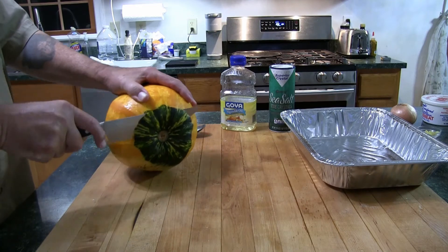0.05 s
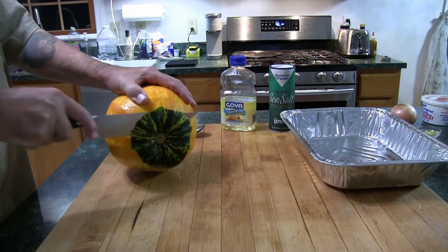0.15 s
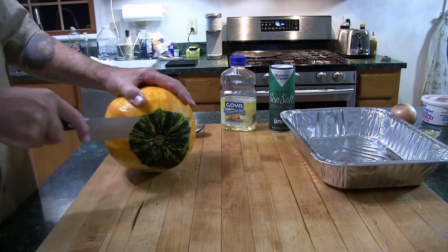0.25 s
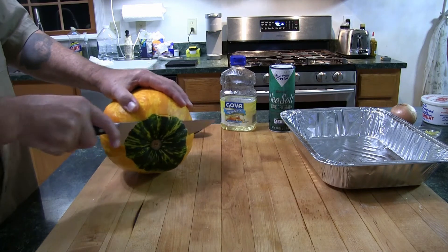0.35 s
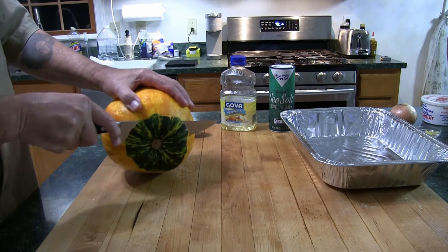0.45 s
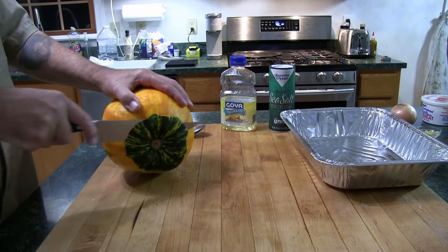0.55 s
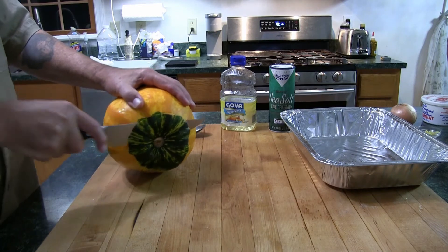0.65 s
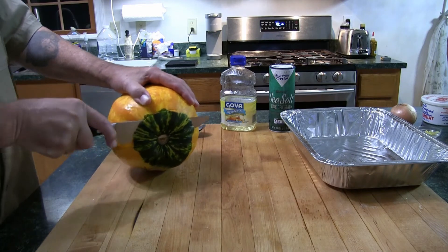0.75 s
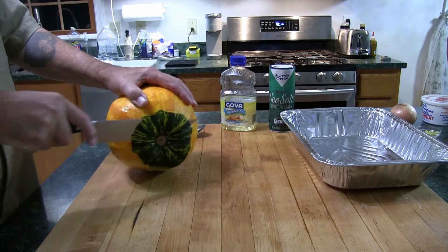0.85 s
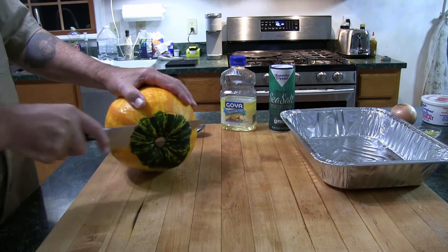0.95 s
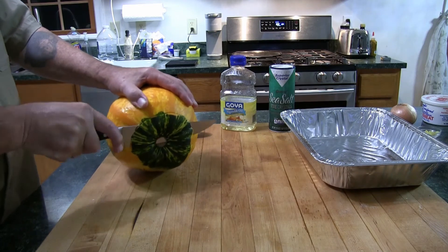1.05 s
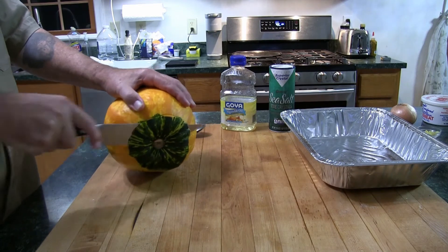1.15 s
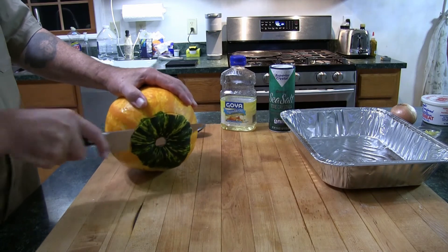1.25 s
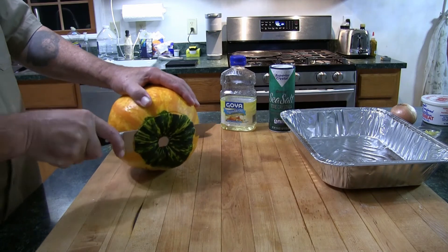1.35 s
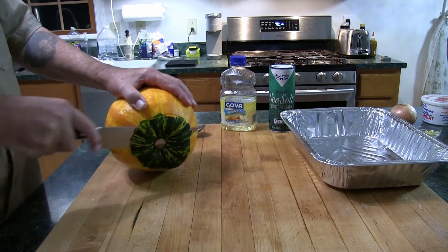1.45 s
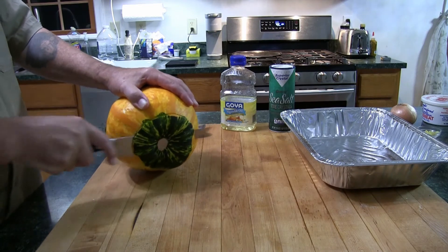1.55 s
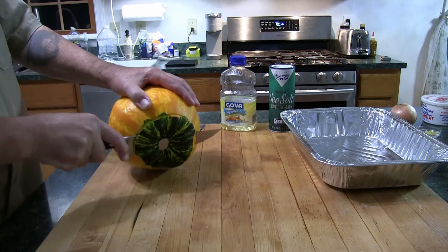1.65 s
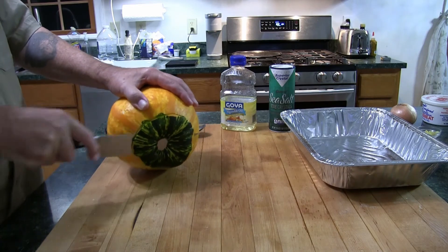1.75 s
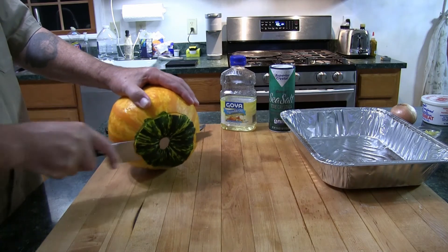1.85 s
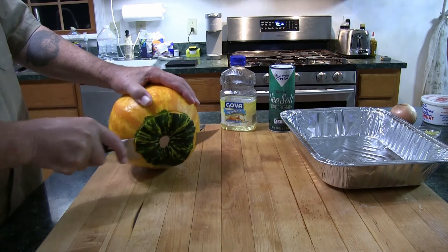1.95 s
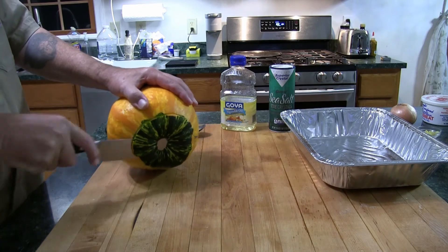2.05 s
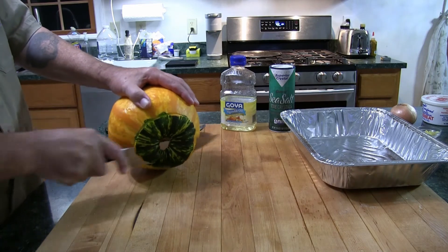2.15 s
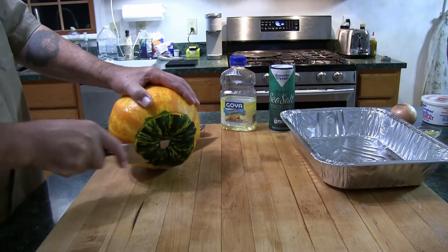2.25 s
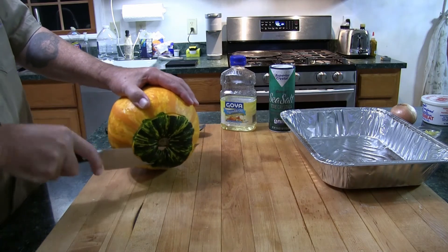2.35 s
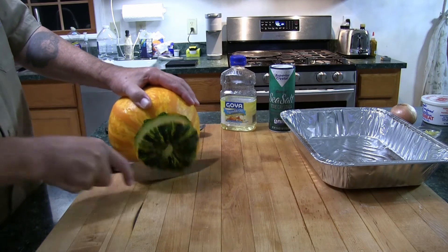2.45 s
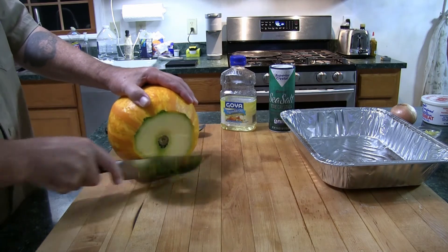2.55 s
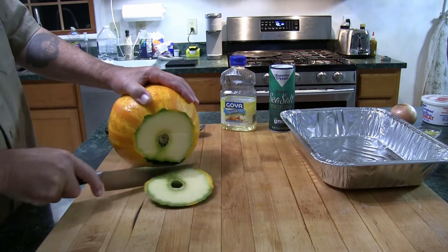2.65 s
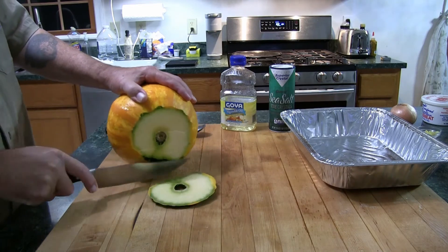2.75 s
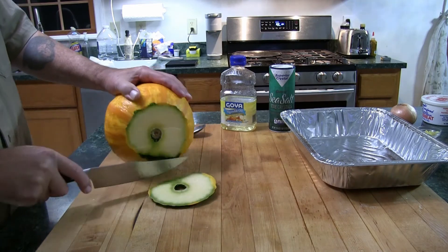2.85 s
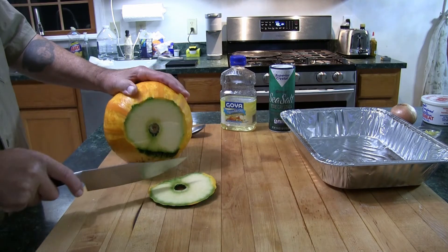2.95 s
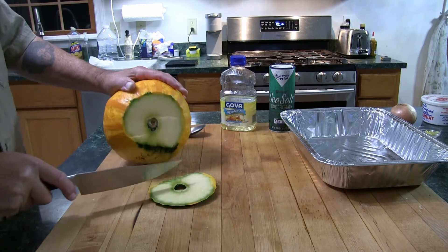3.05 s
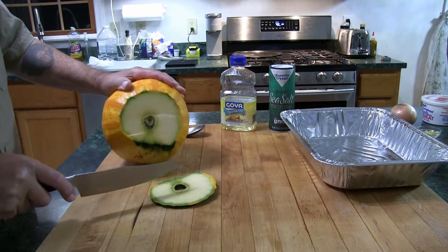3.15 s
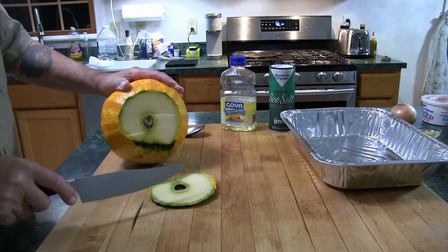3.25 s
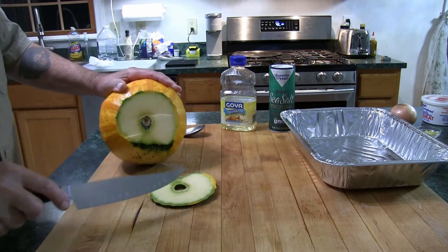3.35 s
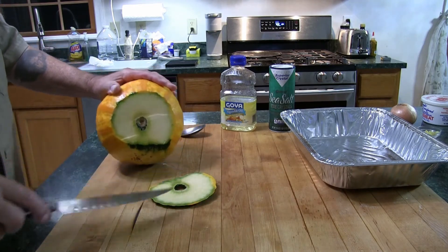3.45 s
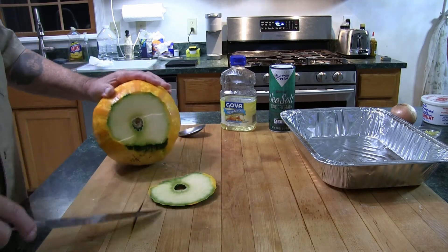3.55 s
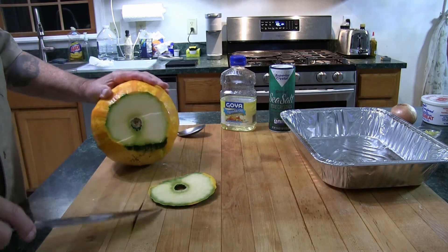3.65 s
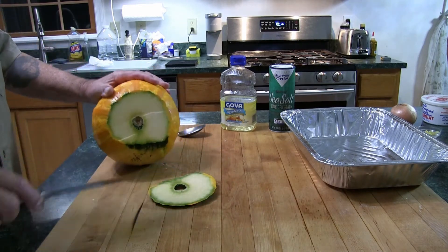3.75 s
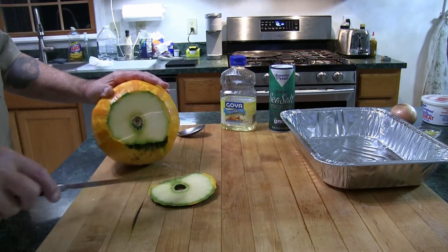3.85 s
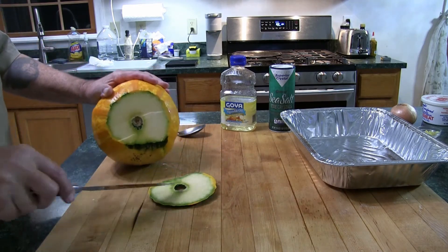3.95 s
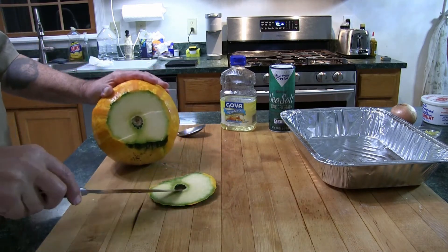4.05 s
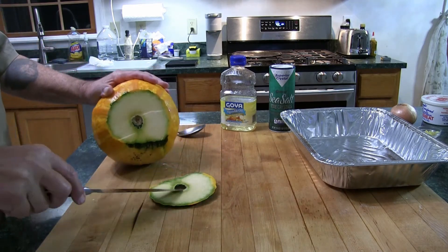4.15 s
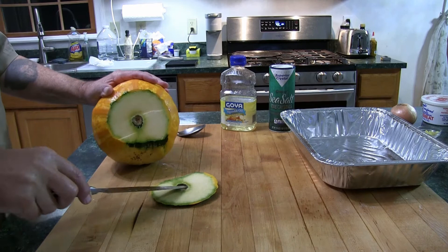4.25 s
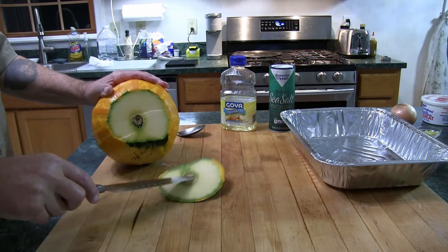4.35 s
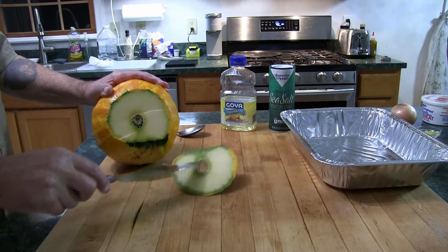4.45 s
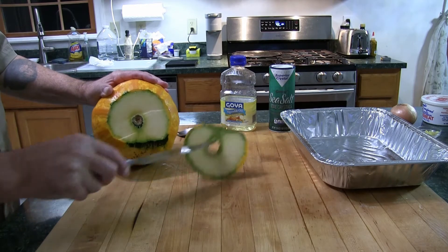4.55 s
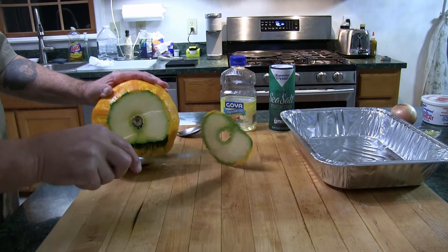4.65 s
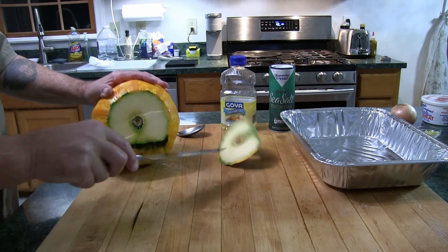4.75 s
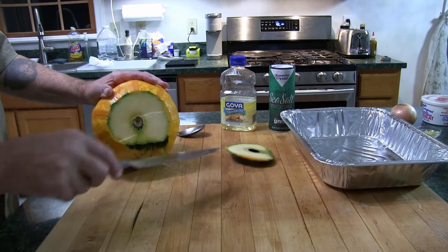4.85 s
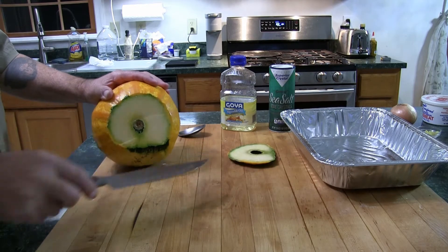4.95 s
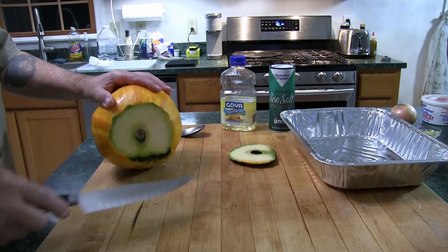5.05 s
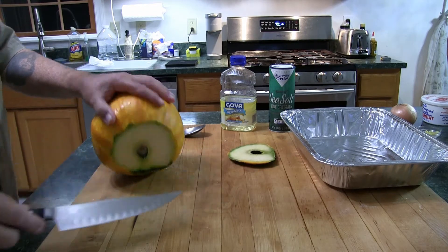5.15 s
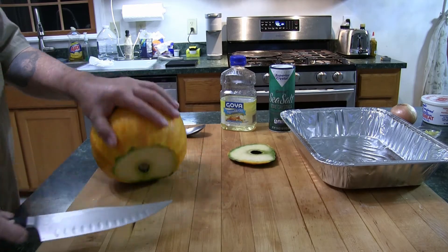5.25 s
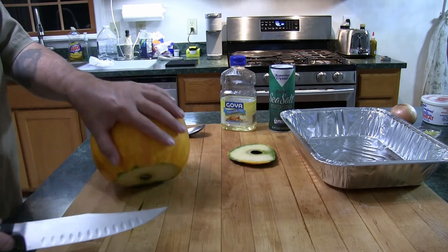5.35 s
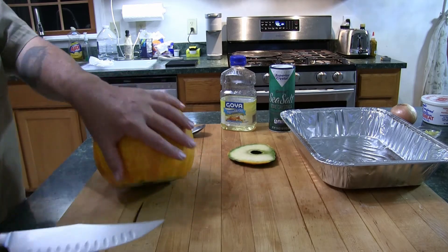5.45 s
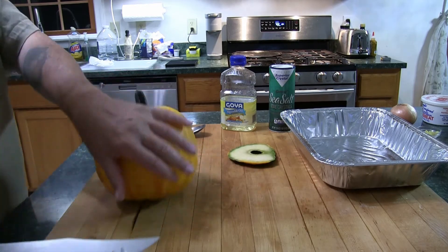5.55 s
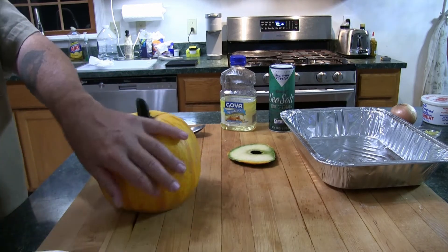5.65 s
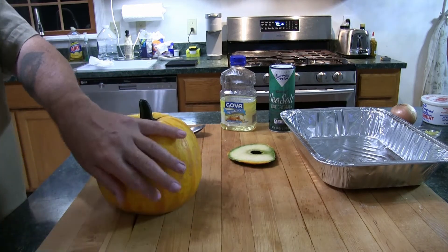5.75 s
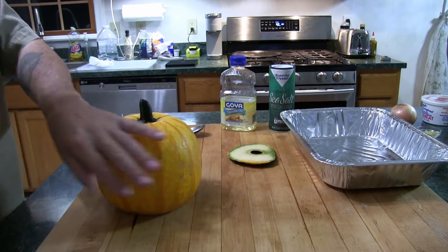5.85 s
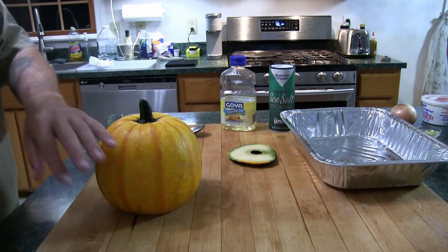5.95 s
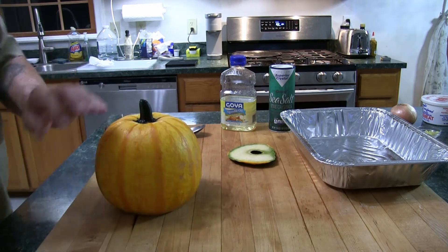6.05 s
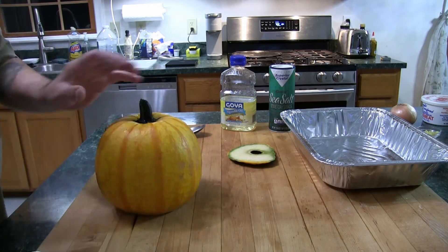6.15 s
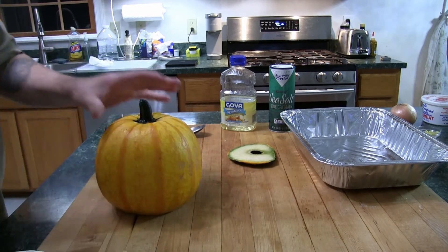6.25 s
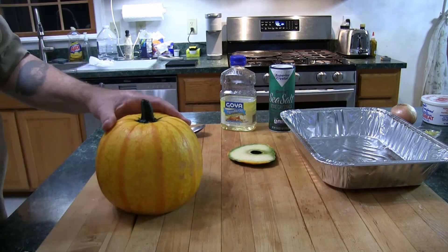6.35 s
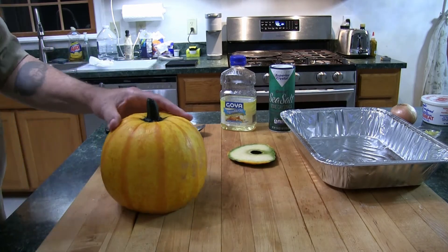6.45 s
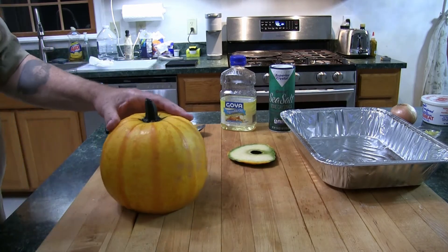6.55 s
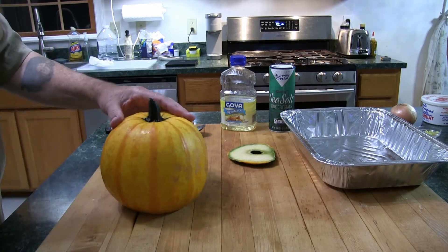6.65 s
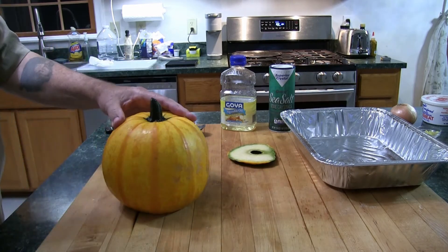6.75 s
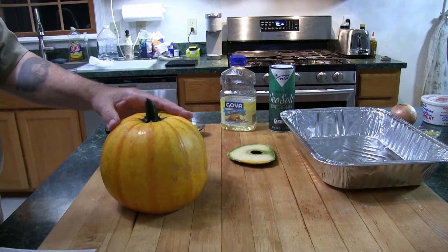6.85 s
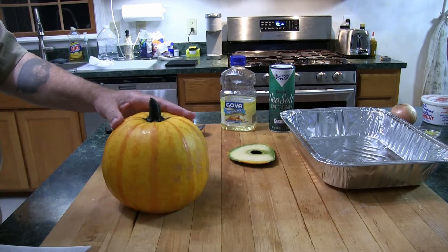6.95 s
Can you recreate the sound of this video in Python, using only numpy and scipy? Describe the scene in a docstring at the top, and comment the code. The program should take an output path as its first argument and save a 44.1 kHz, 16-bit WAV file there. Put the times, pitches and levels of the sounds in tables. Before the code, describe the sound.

A knife cracks and crunches through a pumpkin, knocks on a wooden board, and the pumpkin thumps down in a humming kitchen.

```python
"""A chef's knife is rocked through a pumpkin in a hard-walled kitchen: the rind fractures in cracks and
bursting cells crunch. At 2.5 s the blade strikes the wooden board, exciting its modes, and the slice
drops. The blade tip taps twice; near 4.9 s the slice is flipped away. At 5.7 s the pumpkin is set down
with a thump that rattles loose things and rings glassware, and then it rocks faintly. A ringing wash
lingers after each loud knock. Throughout, surfaces reflect, the room reverberates and a fridge hums."""
import sys
import numpy as np
from scipy import signal
from scipy.fft import rfft, irfft, next_fast_len
from scipy.io import wavfile
from scipy.ndimage import uniform_filter1d, map_coordinates

SR = 44100
rng = np.random.default_rng(int(sys.argv[2]) if len(sys.argv) > 2 else 0)


def waveform_to_disk(signal):
    """Save audio, clipped to [-1, 1], as 16-bit WAV at the path in sys.argv[1]."""
    frames = np.transpose(np.atleast_2d(signal))
    scaled = np.clip(frames, -1, 1) * 32767
    samples = np.round(scaled).astype(np.int16)
    wavfile.write(sys.argv[1], SR, samples)


N = 308700

# rind cracks and small ticks: t/s, level/dB, f/Hz, quality factor Q, relative level of upper mode/dB
RIND_CRACKS = [(.3296, -2.5, 4800, 5.5, -7), (0.3342, 1.5, 4970, 2.5, -18), (.3771, -20, 4200, 4, -6),
               (.3822, 2, 5230, 4, -0.5), (0.6727, -13.5, 5000, 3, -2), (0.7023, -3, 3500, 2.5, 4.5),
               (0.7135, -4, 3120, 5.3, -9.5), (0.7367, -9.5, 6070, 8, 2), (1.0022, -25, 3400, 4, -8),
               (1.0214, -12.5, 3770, 4, -7.5), (1.0305, -17, 3840, 4, -8), (1.0428, -24, 3800, 4, -10),
               (1.1765, -28, 3200, 2.7, -3), (1.299, -15.5, 3070, 7, -14), (1.3178, -12, 3270, 3.3, -22),
               (1.3204, -6.5, 3250, 3, -14), (1.33, -11, 3400, 5, -12), (1.3504, -16.5, 3350, 5, -19),
               (1.469, -29, 3500, 3.5, 0), (1.5811, -17.5, 3010, 12, -22), (1.585, -19.5, 3330, 7, -13),
               (1.7057, 3.5, 2440, 4.2, -9.5), (1.7062, -6, 6600, 5, -6), (1.8887, -15, 3470, 6, -27),
               (1.8927, -13, 2940, 4, -14), (2.161, -30, 4200, 2.4, -9), (2.1832, -24, 3100, 4.5, -17),
               (2.4737, -15, 6370, 3.3, -7), (2.4854, -5, 3300, 3, 2), (2.4883, 0.5, 3240, 17, -25),
               (2.4912, 2.5, 3230, 8.6, -24), (2.93, -29, 7000, 2, -13), (4.301, -28.5, 2850, 4.7, -20),
               (4.371, -38, 1500, 3, -8), (4.8657, -17.5, 2940, 8, -13), (4.8769, -17.5, 5500, 2, 6.5),
               (4.9615, -24, 3500, 3, -9), (5.546, -31.5, 3980, 2, -15), (5.6734, -15.5, 3500, 3, -4),
               (6.834, -35.5, 2100, 8.5, -16)]
UPPER_RATIO, UPPER_Q = 1.65, 3  # upper mode of a crack: frequency ratio to the lower, quality factor
CAVITY = (571, 45)  # resonance of the hollow pumpkin: f/Hz, bandwidth/Hz
# pushes of the blade through flesh: peak t/s, swell/s, fade/s, crunch level/dB, wet hiss level/dB
BLADE_PUSHES = [(.335, 0.016, 0.078, -32, -36), (.385, 0.023, 0.13, -38, -36),
                (0.679, 0.017, 0.043, -37, -53), (.725, 0.034, 0.073, -32.5, -34),
                (1.04, 0.089, 0.045, -40.5, -36), (1.324, 0.054, 0.072, -38.5, -31.5),
                (1.59, 0.022, 0.14, -39, -39.5), (1.719, 0.024, 0.29, -40, -36.5),
                (1.895, .02, 0.059, -43, -38.5), (2.19, 0.063, 0.12, -43, -42.5),
                (2.493, 0.017, .022, -23, -19)]
SWELL_DB, JUICE_FADE = 22, 0.73  # level change over a swell or fade; hiss fade time over crunch fade time
# noise spectra: f/Hz, level/dB
CRUNCH_SPECTRUM = [(300, -46), (700, -3.5), (1500, -7.5), (2300, -2), (3100, -2), (3800, 0), (5000, -9.5),
                   (8000, -13.5), (12000, -11.5), (16000, -43)]
JUICE_SPECTRUM = [(2500, -41), (5000, 10), (9000, 4.5), (14000, -4), (17000, 0)]
RUB_SPECTRUM = [(400, -14), (800, -4.5), (1450, -3.5), (1900, -4.5), (3000, -27), (9000, -37)]
RATTLE_SPECTRUM = [(1200, -28), (2200, 2), (4000, -5.5), (7000, -13.5), (12000, -24.5), (16000, -40)]
AIR_SPECTRUM = [(15, -56), (30, -52), (50, -20), (75, -24), (105, -10.5), (150, -12), (285, -7.5),
                (520, -9.5), (720, -14.5), (830, -18), (1500, -19.5), (3000, -22), (6000, -26.5),
                (16000, -62)]
HISS_SPECTRUM = [(1500, -25), (4000, -8.5), (8000, 3), (12000, -3), (15000, -6.5), (16500, -23)]
# impacts on the board: t/s, level/dB, low-pass corner f/Hz
KNIFE_IMPACTS = [(2.251, -43, 500), (2.5155, -2.5, 3600), (2.523, -14, 2500), (2.594, -12.5, 3180),
                 (2.624, -11.5, 3200), (2.679, -9, 2600), (5.718, -20, 3000)]
SLICE_IMPACTS = [(2.679, -14.5, 2420), (2.731, -18, 3000), (4.864, -14.5, 3000), (4.872, -12, 1600),
                 (4.959, -21, 1770)]
PUMPKIN_IMPACTS = [(5.673, -1, 1200), (5.68, -12.5, 990), (5.7, -12.5, 970), (5.718, -18, 2000),
                   (5.777, -20.5, 900)]
ROCKING_IMPACTS = [(6.391, -42.5, 900), (6.41, -49, 600), (6.735, -56, 400), (6.8, -52.5, 400),
                   (6.965, -49, 400)]
# contacts: high-pass corner f/Hz, decay constant/s, level/dB into cavity, wet face, flat blade, counter
KNIFE_CONTACT = (520, 0.02, 12.5, 0, -1, -18.5)
SLICE_CONTACT = (247, .007, 3.5, -2, -13, -4.5)
PUMPKIN_CONTACT = (109, .003, 2.5, -7.5, -22, -1)
ROCKING_CONTACT = (30, .012, -3, -12, -22, 15.5)
# resonances: f/Hz, bandwidth/Hz, level/dB
BOARD_MODES = [(153, 9.6, 4.5), (178, 17, 3), (257, 53, -0.5), (325, 25, 2.5), (436, 66, -1.5),
               (527.3, 18.4, 7), (603, 63, -1.5), (802, 36, 5.5), (1038, 100, -12), (1418, 81, 5.5),
               (1648, 120, -10)]
WET_FACE_MODES = [(1360, 250, 8)]
FLAT_BLADE_MODES = [(2310, 190, 3), (2820, 135, 13)]  # blade lying on wood
COUNTER_MODES = [(76, 9, 7), (119, 12, 4), (150, 14, 2), (185, 16, 0), (235, 30, 0)]  # heavy top under the board
WASH_RESONANCES = [(580, 40, 0), (1030, 120, -8), (1370, 70, -7), (1700, 60, -10), (2280, 60, -9),
                   (2430, 50, -9), (2800, 80, -11)]
FRIDGE_DRONES = [(182.6, 5.9, -7.5), (276, 14, 0), (356, 5.9, 0), (743, 30, -11.5), (1078, 37, -13),
                 (1500, 48, -15.5), (5440, 40, -26.5), (7460, 20, -22)]
# freely ringing modes: f/Hz, level/dB, T60/s
STEEL_MODES = [(1755, 1, .14), (2050, -6, .06), (3300, -6, .06), (3975, -2, .1), (4900, -1, .05),
               (5480, -2, .12), (6365, -3, .08), (9100, -8, .06), (11000, -11, .05)]
GLASS_MODES = [(3090, 0.5, .18), (4500, -9, .2), (5523, -8, .35)]
# touches of the blade tip, and glass jolted by the thump: t/s, level/dB
TIP_TAPS = [(3.634, -46), (3.66, -50)]
GLASS_CLINKS = [(5.727, -28.5), (5.79, -45), (5.905, -52), (5.95, -48)]
# strokes of noise: peak t/s, swell/s, fade/s, level/dB
WASH_STROKES = [(2.61, 0.089, 0.49, -23), (4.9, .04, .5, -54), (5.8, .1, .5, -48)]  # wash that lingers after each loud knock
RUB_STROKES = [(3.1, .2, 0.67, -50.5), (4.45, .15, 0.89, -58.5), (4.9, 0.12, 0.24, -50),
               (5.45, .3, .6, -54.5), (5.95, .2, .6, -50.5), (6.3, .15, 0.37, -57.5)]  # soft scraping and rubbing
RATTLE_STROKES = [(4.87, .005, 0.11, -41), (5.695, 0.034, 0.23, -34.5)]  # loose things shaken by a landing
REFLECTIONS = [(.0055, -9, -9), (.0097, -14, -13), (.0157, -14, -15), (.021, -20, -20)]  # near surfaces: delay/s, left level/dB, right level/dB
REVERBERATION = [(60, 0.47, 8.5), (250, 0.55, 6), (700, 0.77, 4), (1500, 0.81, 4), (2360, 0.97, 3),
                 (3500, 0.81, -2), (6000, 0.75, -0.5), (9800, 0.47, 5.5), (15400, 0.41, 7)]  # tail of the room: f/Hz, T60/s, level/dB
# likeness of left and right: f/Hz, coherence
ROOM_COHERENCE = [(60, 1), (250, 0.99), (700, 0.72), (2000, 0.52), (8000, 0.43), (15000, .3)]
AIR_COHERENCE = [(60, 0.65), (180, 0.96), (550, 0.66), (1650, 0.49), (4970, 0.52), (15000, 0.54)]
BACKGROUND_LEVELS = [(0, -38, -49), (.31, -40.5, -54), (.37, -49, -59), (1, -47.5, -58.5),
                     (1.6, -47, -52.5), (2, -49.5, -61.5), (2.6, -47.5, -57), (3.1, -49.5, -65),
                     (4.1, -48.5, -62), (4.6, -46.5, -61), (5.6, -44, -59.5), (5.9, -46, -62),
                     (7, -47, -61)]  # t/s, level of air and hum/dB, level of treble hiss/dB


def rind_cracks():
    """Brittle fracture: each split excites two damped modes and knocks the hollow fruit."""
    out, t = np.zeros(N), np.arange(SR // 16) / SR
    cavity_hz, cavity_width = CAVITY
    knock = amp(-24.5 - 87 * t * cavity_width) * np.sin(2 * np.pi * 1.076 * cavity_hz * t)
    for s, db, hz, q, upper_db in RIND_CRACKS:
        tear = amp(-60 * t / .002) * (.35 * rng.standard_normal(len(t)) + (t == 0))
        upper_hz = hz * UPPER_RATIO
        ring = filtered(tear, resonances([(hz, hz / q, 0), (upper_hz, upper_hz / UPPER_Q, upper_db)]))
        ring = filtered(ring, lambda f: highpass(f, 1300, 2))  # a small split radiates no bass
        add(out, s, amp(db) * (ring / np.abs(ring).max() + knock))
    return filtered(out, lambda f: 1 / (1 + 1j * f / 12500) ** 2)  # damp flesh dulls the top


def flesh_crunch():
    """Shot noise: cells burst under the edge as dense, uneven grains, with a finer wet hiss."""
    grains = (rng.random(N) < .1) * rng.standard_normal(N) * amp(1.5 * rng.exponential(size=N))
    crunch = coloured(grains * amp(3 * wobble(120)), CRUNCH_SPECTRUM)
    hiss = coloured(uneven_noise(depth_db=3.2, rate=200), JUICE_SPECTRUM)
    pressing = strokes([(s, swell, fade, db) for s, swell, fade, db, _ in BLADE_PUSHES])
    wetting = strokes([(s, swell, JUICE_FADE * fade, db) for s, swell, fade, _, db in BLADE_PUSHES])
    return pressing * crunch + wetting * hiss


def board_impacts():
    """Impact excitation of modes: a soft contact loses treble, a light object loses bass."""
    forces, thrust, t = np.zeros((4, N)), np.zeros(N), np.arange(SR // 16) / SR
    slow_pulse = np.pad(np.hanning(SR // 350), (0, len(t)))  # the weight arrives more slowly
    strikers = [(KNIFE_IMPACTS, KNIFE_CONTACT), (SLICE_IMPACTS, SLICE_CONTACT),
                (PUMPKIN_IMPACTS, PUMPKIN_CONTACT), (ROCKING_IMPACTS, ROCKING_CONTACT)]
    for impacts, (low_hz, decay_s, *parts_db, counter_db) in strikers:
        weight = filtered(slow_pulse, lambda f: highpass(f, low_hz / 2, 3))
        for s, db, high_hz in impacts:
            push = np.exp(-t / decay_s) * (0.11 * rng.standard_normal(len(t)) + (t == 0))
            push = filtered(push, lambda f: highpass(f, low_hz, 2) / (1 + 1j * f / high_hz) ** 3)
            add(forces, s, amp(db + np.c_[[0, *parts_db]]) * push / np.abs(push).max())
            add(thrust, s, amp(db + counter_db) * weight / np.abs(weight).max())
    wood = resonances(BOARD_MODES)
    knocks = filtered(forces[0], lambda f: 2.27 * wood(f) + 0.85)  # some contact noise is heard directly
    parts = [(*CAVITY, 4)], WET_FACE_MODES, FLAT_BLADE_MODES
    knocks += sum(filtered(force, resonances(modes)) for force, modes in zip(forces[1:], parts))
    boom = filtered(thrust, resonances(COUNTER_MODES))
    return knocks, boom


def ringing(hits, modes, looseness, scratch_db):
    """Free vibration of struck steel or glass: each touch scratches and excites the modes anew."""
    out, t = np.zeros(N), np.arange(SR // 2) / SR
    attack = 1 - np.exp(-t / 0.00017)
    for s, db in hits:
        tones = sum(amp(level + rng.normal(0, 2) - 60 * t / t60) * np.sin(2 * np.pi * hz * t)
                    for hz, level, t60 in modes)
        flutter = unit(uniform_filter1d(rng.standard_normal(len(t)), size=100))
        unsteady = 1 + looseness * flutter  # a loose contact damps unevenly
        scratch = amp(scratch_db - 60 * t / 0.094) * rng.standard_normal(len(t))
        add(out, s, amp(db) * attack * (tones * unsteady + scratch))
    return out


def lingering_wash():
    """Resonant filtering: a lingering, ringing wash of noise fades after each loud knock."""
    peaks = resonances(WASH_RESONANCES)
    noise = uneven_noise(depth_db=2, rate=50)
    wash = filtered(noise, lambda f: peaks(f) + 0.086 * (f > 450) / (1 + (f / 3300) ** 4))
    return strokes(WASH_STROKES) * unit(wash)


def rubbing():
    """Sliding friction: soft scraping and rubbing comes and goes as a dull, uneven noise."""
    return strokes(RUB_STROKES) * coloured(uneven_noise(depth_db=3, rate=40), RUB_SPECTRUM)


def rattle():
    """Intermittent contact: loose things on the counter jitter for a moment after a landing."""
    jitter = uneven_noise(depth_db=3.7, rate=150)
    return strokes(RATTLE_STROKES) * coloured(jitter, RATTLE_SPECTRUM)


def kitchen(direct, sent):
    """Reflection: near surfaces echo the direct sound, and what is sent into the room reverberates."""
    out = direct * amp([[-.1], [.1]])
    for delay, left_db, right_db in REFLECTIONS:
        add(out, delay, direct * amp([[left_db], [right_db]]))
    hz, t = np.fft.rfftfreq(256, 1 / SR), np.arange(SR // 128) * 128 / SR
    t60, level_db = along(REVERBERATION, hz), along(REVERBERATION, hz, column=2)
    decay = amp(level_db[:, None] - 60 * t / t60[:, None])
    angle = side_angle(ROOM_COHERENCE, hz)[:, None]
    step = SR // 4
    for start in range(0, N, step):  # a new tail as the source moves
        a, b, c, d = rng.standard_normal((4, *decay.shape)) * decay
        mid, side = (a + 1j * b) * np.cos(angle), (c + 1j * d) * np.sin(angle)
        tail = signal.istft(np.array([mid + side, mid - side]), SR, nperseg=256)[1]
        build_up = np.minimum(np.arange(tail.shape[1]) / (.014 * SR), 1)
        tail = tail * build_up / np.linalg.norm(tail[0])
        add(out, start / SR + .002, signal.fftconvolve(sent[None, start:start + step], tail, axes=1))
    return out


def background():
    """Superposition of room air, narrow-band refrigerator drones, mains hum and a treble hiss."""
    t = np.arange(N) / SR
    times, *levels = np.transpose(BACKGROUND_LEVELS)
    air_gain, hiss_gain = [amp(np.interp(t, times, db)) for db in levels]
    broad = coloured(rng.standard_normal((2, N)), AIR_SPECTRUM)
    drones = unit(filtered(rng.standard_normal((2, N)), resonances(FRIDGE_DRONES)))
    air = unit(spread(broad + amp(-1.5) * drones, AIR_COHERENCE)) * amp(0.57 * wobble(5.9))
    hiss = coloured(rng.standard_normal((2, N)), HISS_SPECTRUM)
    hum = amp(-14 + 2.1 * wobble(10)) * np.sin(2 * np.pi * 60 * t)
    return air_gain * (air + hum) + hiss_gain * spread(hiss, AIR_COHERENCE)


def amp(db):
    """Amplitude ratio of a level in dB."""
    return 10 ** (np.asarray(db) / 20)


def unit(x):
    """Normalisation to rms 1."""
    return x / np.sqrt(np.mean(x ** 2) + 1e-20)


def along(points, hz, column=1):
    """Interpolation of a table column over log frequency."""
    table = np.array(points)
    return np.interp(np.log(hz + 1), np.log(table[:, 0] + 1), table[:, column])


def wobble(rate):
    """Smooth random fluctuation with rate knots a second."""
    return map_coordinates(rng.standard_normal(int(N * rate / SR) + 4), [np.arange(N) * rate / SR])


def uneven_noise(depth_db, rate):
    """Random amplitude modulation of white noise."""
    return rng.standard_normal(N) * amp(depth_db * wobble(rate))


def strokes(rows):
    """Exponential growth and decay about each peak, summed into one envelope."""
    t = np.arange(0, N, 16) / SR
    gain = sum(amp(db - SWELL_DB * np.where(t < s, (s - t) / swell, (t - s) / fade))
               for s, swell, fade, db in rows)
    return np.interp(np.arange(N) / SR, t, gain)


def filtered(x, response):
    """Linear filtering: the spectrum of x times a frequency response."""
    size = next_fast_len(x.shape[-1] + min(x.shape[-1], SR // 2))
    return irfft(rfft(x, size) * response(np.fft.rfftfreq(size, 1 / SR)), size)[..., :x.shape[-1]]


def coloured(noise, spectrum):
    """Spectral shaping of noise, at rms 1."""
    return unit(filtered(noise, lambda hz: amp(along(spectrum, hz))))


def highpass(f, corner_hz, order):
    """Response of first-order high-pass stages in cascade."""
    return (1j * f / (corner_hz + 1j * f)) ** order


def resonances(modes):
    """Modal sum: the response of damped oscillators of alternating sign."""
    return lambda f: sum((-1) ** k * amp(db) * 1j * f * width / (hz * hz - f * f + 1j * f * width)
                         for k, (hz, width, db) in enumerate(modes))


def side_angle(coherence, hz):
    """Mid-side mixing angle: coherence is the cosine of twice this angle."""
    return np.arccos(np.clip(along(coherence, hz), -1, 1)) / 2


def spread(pair, coherence):
    """Partial coherence: two independent signals are mixed to left and right."""
    angle = lambda hz: side_angle(coherence, hz)
    mid, side = filtered(pair, lambda hz: np.array([np.cos(angle(hz)), np.sin(angle(hz))]))
    return np.array([mid + side, mid - side])


def add(track, s, sound):
    """Superposition of a sound on the track at s seconds."""
    piece = track[..., round(s * SR):][..., :sound.shape[-1]]
    piece += sound[..., :piece.shape[-1]]


def scene():
    """Superposition of the direct sound, the room's response and the background."""
    cracks, crunch = rind_cracks(), flesh_crunch()
    knocks, boom = board_impacts()
    noises = lingering_wash() + rubbing() + rattle()
    steel = ringing(TIP_TAPS, STEEL_MODES, looseness=.7, scratch_db=-3)
    glass = ringing(GLASS_CLINKS, GLASS_MODES, looseness=.15, scratch_db=-14)
    direct = cracks + crunch + knocks + steel + glass + noises
    sent = (amp(-3) * (cracks + crunch) + amp(0.5) * knocks + amp(-3.5) * (steel + glass)
            + amp(-2) * noises + amp(-1.5) * boom)
    return kitchen(direct, sent) + boom + background()


def record(dry):
    """Band limiting and saturation: the lowest bass and top treble are dropped, and peaks are rounded."""
    thin = filtered(dry, lambda f: highpass(f, 28, 2))
    soft = thin / (1 + np.abs(thin / .98) ** 6) ** (1 / 6)
    return filtered(soft, lambda hz: hz < 16100)


dry = scene()
out = record(dry)
waveform_to_disk(out)
```